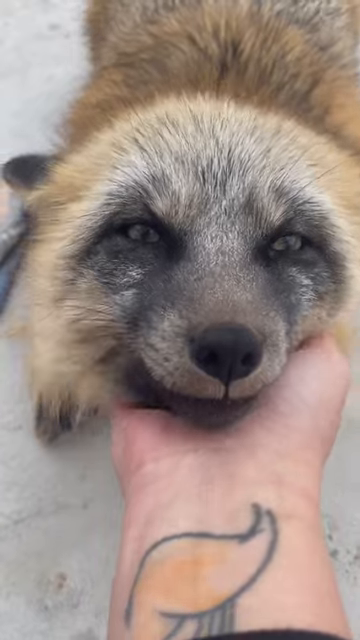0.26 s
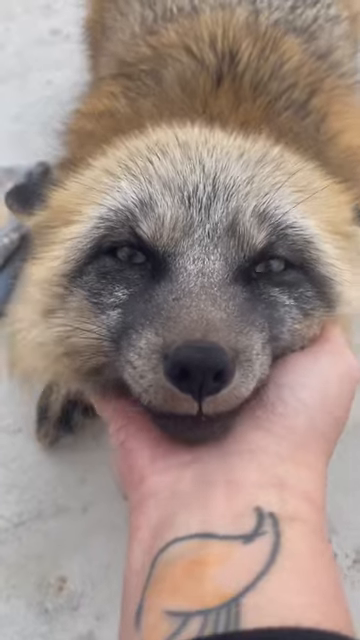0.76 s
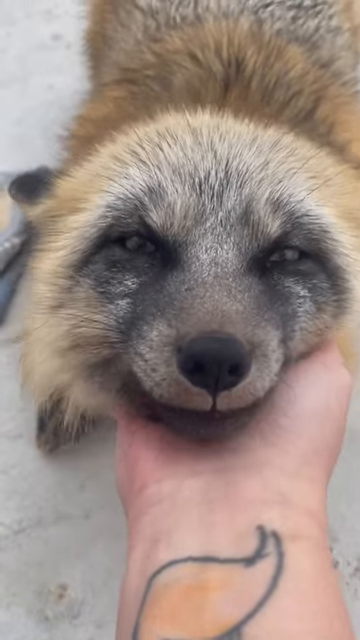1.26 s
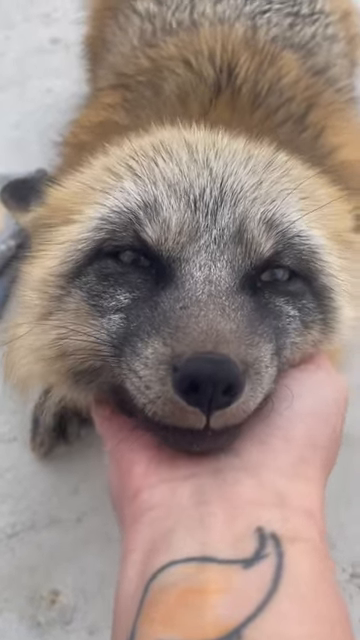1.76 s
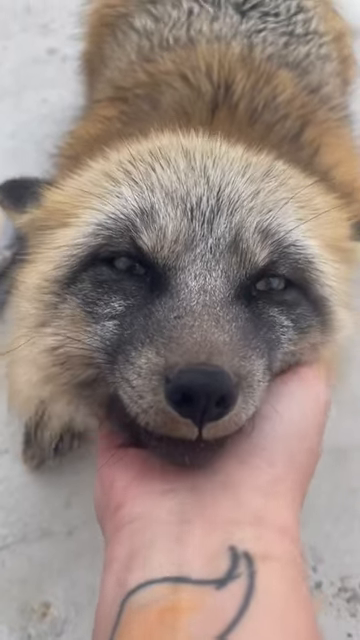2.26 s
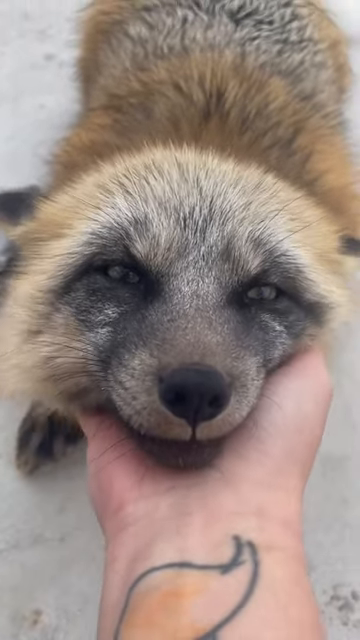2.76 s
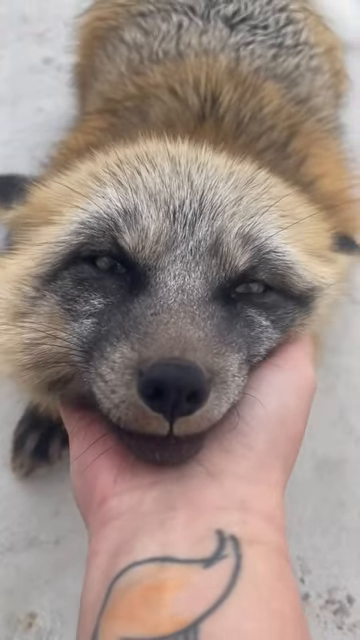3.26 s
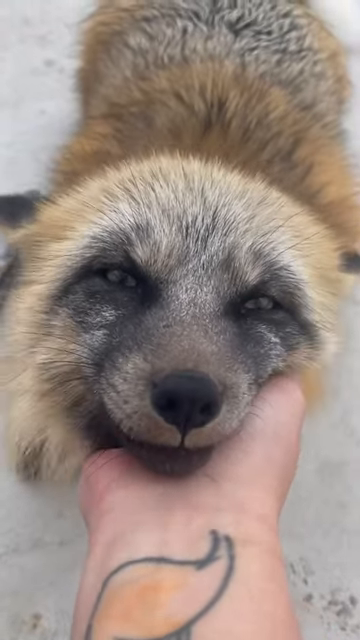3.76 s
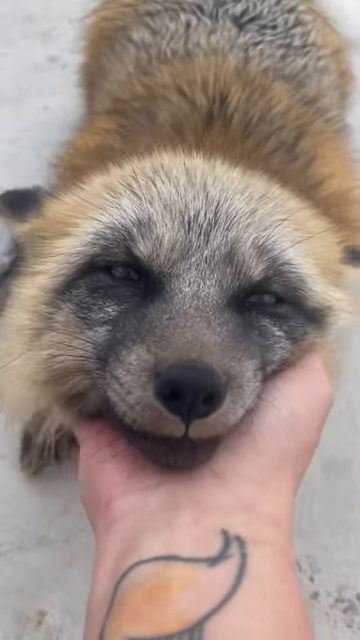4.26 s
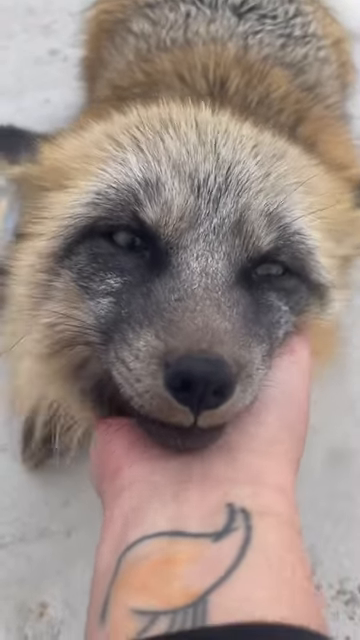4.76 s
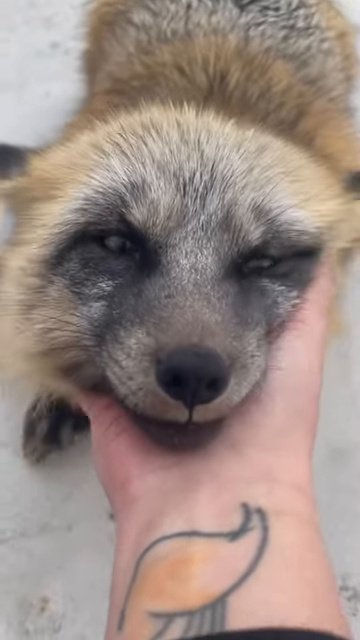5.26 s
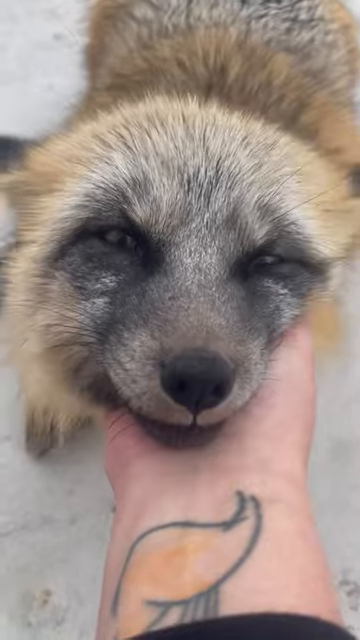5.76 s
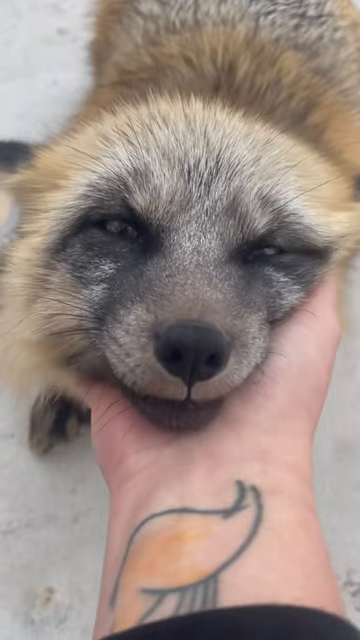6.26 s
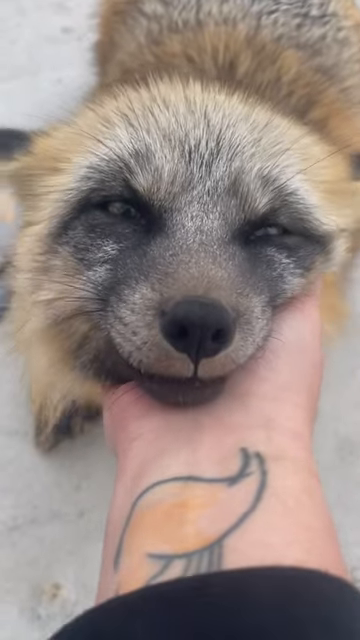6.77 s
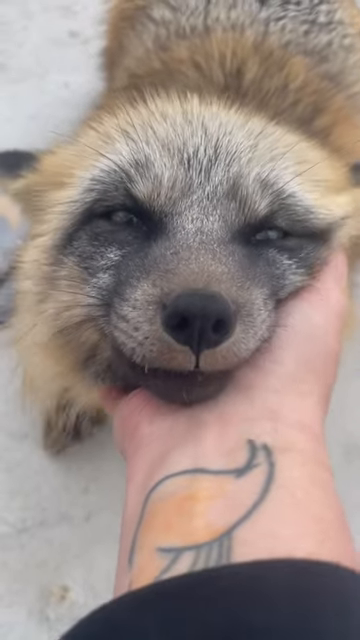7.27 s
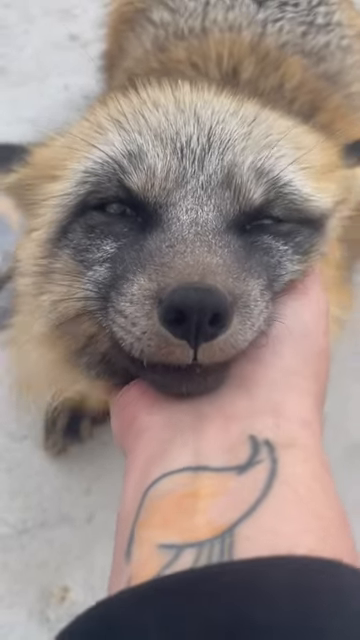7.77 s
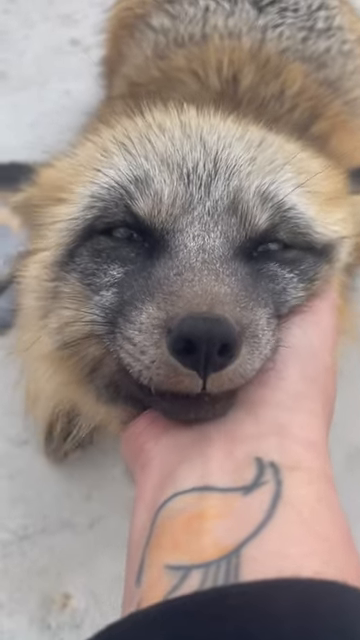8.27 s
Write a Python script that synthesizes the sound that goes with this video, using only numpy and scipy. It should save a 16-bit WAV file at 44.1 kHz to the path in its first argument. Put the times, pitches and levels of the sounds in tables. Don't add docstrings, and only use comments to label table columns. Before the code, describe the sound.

A fox very close by gives long, high nasal whines that sag at the end, over a low distant road rumble outdoors.

```python
import sys
import numpy as np
from scipy import signal
from scipy.fft import rfft, irfft, next_fast_len
from scipy.io import wavfile

SR = 44100
rng = np.random.default_rng(int(sys.argv[2]) if len(sys.argv) > 2 else 0)


def invert_db(x):
    u = np.asarray(x, float) / 20
    return 10 ** u


def wav_out(sig):
    wavfile.write(sys.argv[1], SR, np.round(np.clip(np.atleast_2d(sig).T, -1, 1) * 32767).astype(np.int16))


N = 376173
TIME = np.arange(N) / SR
BINS_HZ = np.arange(N // 2 + 1) * SR / N + 1e-3


def at(hz, points_hz, values):
    return np.interp(np.log(hz), np.log(np.maximum(points_hz, 1)), values)


def chance():
    real, imaginary = rng.standard_normal(len(BINS_HZ)), rng.standard_normal(len(BINS_HZ))
    return (real + 1j * imaginary) * np.sqrt(N / 2)


def noise(gain):
    return irfft(chance() * gain, next_fast_len(N))[:N]


def coloured(gain):
    x = noise(gain)
    return x / np.std(x)


def walk(rate):
    return coloured(1 / (1 + (BINS_HZ / rate) ** 2))


def peak(hz, width):
    return 1 / (1 + (2 * (BINS_HZ - hz) / width) ** 2) ** 1.5


def bell(x, centre, half):
    return np.exp(-((x - centre) / half) ** 2)


def swell(start, end, edge):
    ramp = np.clip(np.minimum(TIME - start, end - TIME) / edge, 0, 1)
    return np.sin(np.pi / 2 * ramp) ** 2


def ports(x, lead, side_db):
    turn = np.array([[1], [-1]]) / 2
    return irfft(rfft(x) * np.exp(1j * turn * lead) * invert_db(turn * side_db), N)


# (frequency [Hz], level [dB per Hz])
AIR = [(25, -81.5), (50, -62), (82, -54.5), (120, -62), (190, -62), (290, -78), (390, -78.5), (550, -81.5),
       (900, -82), (1400, -92), (3000, -100), (6500, -106), (9800, -99), (10700, -106)]
# (frequency [Hz], left leads by [rad], left minus right [dB], likeness [0-1])
AIR_PORTS = [(60, 0, -.5, .995), (200, 0, -1.5, .97), (360, 0, -4.5, .8), (600, -2.5, -2, .3),
             (1100, -3, -.5, .4), (1600, 0, -.5, .7), (3000, .7, 0, .85), (4200, .8, 0, .85),
             (4900, 3.1, 0, .95), (5500, 6.28, 0, 1), (6100, 6.3, 0, 1), (8400, 9.2, 0, 1),
             (9200, 9.45, 0, 1), (10600, 10.3, 0, 1)]
# (time [s], level [dB])
RUMBLE = [(0.03, -42.5), (1.66, -40), (1.69, -43.5), (1.95, -35.5), (2.25, -39.5), (2.33, -35),
          (2.37, -43.5), (2.47, -34), (2.54, -37.5), (3.46, -42), (5.26, -41.5), (5.31, -37.5),
          (5.92, -44.5), (6.09, -38), (8.41, -39.5), (8.53, -41)]
# (loudest at [s], half width [s], level [dB])
PASSES = [
    (1.3, .45, 3),
    (4.05, 0.28, 1.5),
    (5.05, .15, 2),
    (7.1, .4, 2),
    (8.299, 0.38, 5.5),
]
# (time [s], how far it faces the road [share])
TURN = [
    (.3, -1.5),
    (1.7, -0.41),
    (3.0, -.2),
    (4.3, 1),
    (4.9, 0.23),
    (6.9, .4),
    (8.5, 0.43),
]
BAND_TOPS_HZ = (120, 420, 1300, 4500)
RUMBLE_SHARES = (0.93, 0.14, .05, .05, .05)
TURN_DB = (0, 2.5, 5, 1.5, 1)
DRIFT_DB_PER_S = (-0.033, -0.34, -0.56, -0.18, -1.25)


def air():
    air_hz, air_db = np.transpose(AIR)
    port_hz, _, _, likeness = np.transpose(AIR_PORTS)
    like = np.clip(at(BINS_HZ, port_hz, likeness), 0, 1)
    rumble_db = np.interp(TIME, *np.transpose(RUMBLE)) - np.mean(RUMBLE, axis=0)[1]
    turned = np.interp(TIME, *np.transpose(TURN))
    passes_db = sum(db * bell(TIME, s, half) for s, half, db in PASSES) - 1.0
    treble_cut_db = 60 * np.clip(np.log2(BINS_HZ / 10700), 0, 1) * 0.76
    shape = invert_db(at(BINS_HZ, air_hz, air_db) - treble_cut_db) * np.sqrt(SR / 2)
    shared, own = np.zeros(N), np.zeros(N)
    for hz in 25 * 2 ** np.arange(0, 9.6, .5):
        band = shape * np.cos(np.pi * np.clip(np.log2(BINS_HZ / hz), -.5, .5))
        k = np.searchsorted(BAND_TOPS_HZ, hz)
        gain_db = RUMBLE_SHARES[k] * rumble_db + TURN_DB[k] * turned
        gain_db = gain_db + DRIFT_DB_PER_S[k] * (TIME - 4.0) + (k == 1) * passes_db
        gain_db = gain_db + 0.78 * walk(1.0) + 0.29 * walk(27.0)
        gain_db = gain_db + (hz > 8000) * 3.6 * walk(15)
        shared += invert_db(gain_db) * noise(band * np.sqrt((1 + like) / 2))
        own += invert_db(gain_db) * noise(band * np.sqrt((1 - like) / 2))
    return shared + np.array([[1], [-1]]) * own


# (pitch [Hz], wander [Hz], level [dB], start [s], end [s])
HUMS = [
    (81.35, 2.314, -35.5, 6.5, 7.7),
    (165.8, 6.13, -47.5, 0.4, 5.17),
    (382.1, 3.67, -57, 3, 8.5),
    (438.4, 5.3, -60, 2, 5.88),
    (485, 1.7, -55.5, 0, 0.41),
]


def hums():
    out = np.zeros(N)
    for hz, width, db, start, end in HUMS:
        phase = 2 * np.pi * np.cumsum(hz + width / 2 * walk(3.16)) / SR
        out += invert_db(db + 4.1 * walk(0.87)) * swell(start - .3, end + 0.4, 0.66) * np.sin(phase)
    return out


def background():
    port_hz, lead, side_db, _ = np.transpose(AIR_PORTS)
    return ports(air() + hums(), at(BINS_HZ, port_hz, lead), at(BINS_HZ, port_hz, side_db))


# (time [s], pitch [Hz])
PITCH = [
    [(.616, 869), (1.0, 822), (1.26, 785.2), (1.37, 769), (1.42, 699), (1.468, 685), (1.516, 553),
     (1.585, 452), (1.602, 497)],
    [(2.885, 908), (3.01, 926), (3.05, 887), (3.43, 845.7), (3.6, 850.5), (3.72, 800), (3.97, 754.5),
     (4.01, 706.7), (4.065, 634)],
    [(5.602, 949), (5.66, 905.5), (5.85, 932), (5.96, 909), (6.05, 855.5), (6.2, 881), (6.4, 854.3),
     (6.68, 837), (6.76, 655)],
    [(8.238, 923), (8.33, 950.5), (8.43, 929.6), (8.53, 948)],
]
# (time [s], level [dB], nostril opening [dB], breath pressure [dB])
EFFORT = [
    [(.612, -29.5, -21, -17.5), (.69, -29.5, -9.5, -14.5), (1.04, -28.5, -9, -13.5), (1.23, -28, -17, -9.5),
     (1.36, -28.5, -11.5, -12.5), (1.43, -26.5, -16.5, -17.5), (1.53, -32, -22.5, -16),
     (1.586, -27.5, -26.5, -21), (1.602, -38.5, -21, -20)],
    [(2.875, -42, -28, -35), (2.96, -35, -35, -25), (3.04, -28, -11.5, -16), (3.18, -29, -11.5, -14),
     (3.45, -28, -9.5, -15), (3.78, -28, -9.5, -13.5), (4.0, -28, -15, -17.5), (4.058, -27.5, -19, -23.5)],
    [(5.598, -29.5, -11, -20.5), (5.7, -29, -16, -19), (5.93, -25.5, -22.5, -18.5),
     (6.01, -31.5, -6.5, -20), (6.25, -27, -14.5, -15), (6.4, -31, -5, -19), (6.55, -29, -14, -17),
     (6.7, -30, -10.5, -19), (6.768, -28.5, -23, -27.5)],
    [(8.236, -25.5, -22.5, -26), (8.32, -27, -14, -23.5), (8.42, -29.5, -7, -22.5), (8.53, -28, -15, -21)],
]
# (depth [share], period [s], highest crest at [s], dies away in [s])
SWAY = [
    (0.0083, .15, .97, 0.41),
    (0.0283, .172, 3.145, 0.52),
    (.022, .172, 6.145, 0.33),
    (0.0066, 0.174, 9.9, 1.3),
]
# (roughness at the start [0-1], roughness gained [per s], most [0-1.1])
ROUGH = [
    (.35, 1.1, .9),
    (.35, .55, 1.1),
    (.12, .6, .7),
    (.12, 0, .12),
]
# (near 2.8 kHz [dB], near 3.7 kHz [dB], near 4.8 kHz [dB], near 9 kHz [dB])
POSE = [
    (0, -5, -12, -6),
    (-3.5, 3, -3, -1.5),
    (-0.5, 6, 4, 5),
    (8, 4, 4.5, 9),
]
# (time [s], pitch jump [share], level change [dB], half width [s], pinch [dB])
JOLTS = [(.616, 0.17, -3.5, 0.0061, -0.5), (0.802, -0.096, -1, 0.01, -19), (1.098, -0.039, -1, 0.01094, -6),
         (1.4, -0.075, -6, 0.0098, 2.5), (2.928, 0.0015, -3, .01, -5.5), (3.273, 0.012, -5, 0.014, -0.5),
         (3.619, 0.048, -5, 0.0097, -5), (3.961, .005, -6.5, 0.0079, 0), (3.992, -.08, -5, .014, -3),
         (5.602, 0.045, 1.5, .01, 0), (5.635, 0.083, -7, 0.01, -17), (5.98, 0.065, -6, 0.0092, -4.5),
         (6.323, 0.053, -4, 0.0083, -5), (6.664, 0.086, -5.5, 0.0044, 0), (8.245, 0.11, -3, 0.014, -7.5),
         (8.352, 0.04, -6, 0.012, -11.5)]
# (frequency [Hz], overtone level [dB], hiss level [dB])
NOSE = [(426, -9, -2), (560, -1, -36), (2210, 2.5, 0), (3060, -2, 6), (3430, -16.5, -42), (3960, -28, -26),
        (4330, -4.5, -35), (5040, 1, 6), (5600, -9.5, -37), (6030, 1, 11.5), (7360, -10.5, -12),
        (8080, 0.5, 7), (10310, -6.5, 7), (10300, -20, -40)]
BAND_EDGES_HZ = (1130, 2080, 4000)


def whines():
    times, *controls = np.vstack(EFFORT).T
    level_db, open_db, press_db = (np.interp(TIME, times, c) for c in controls)
    gates = np.array([swell(w[0][0], w[-1][0] + 0.0065, edge=0.0066) for w in EFFORT])
    third_db, fourth_db, mid_db, top_db = np.transpose(POSE) @ (gates > 0)
    hz, rough, pinch_db = np.interp(TIME, *np.vstack(PITCH).T), 0, 0
    for whine, gate, sway, loosening in zip(EFFORT, gates > 0, SWAY, ROUGH):
        share, period, crest, dies = sway
        first, per_s, most = loosening
        since = TIME - crest
        hz = hz * (1 + gate * share * np.exp(-np.abs(since) / dies) * np.cos(2 * np.pi * since / period))
        rough = rough + gate * np.minimum(first + per_s * (TIME - whine[0][0]), most)
    third_db = third_db + 7.5 * (rough - .6)

    for s, jump, db, half, pinch in JOLTS:
        bump = bell(TIME, s, half)
        hz = hz * (1 + jump * bump)
        level_db = level_db + db * bump
        open_db = open_db + (1.5 - db) * bump
        pinch_db = pinch_db + pinch * bell(TIME, s + 0.073, 0.038)
        rough = rough * (1 + .9 * bump) + 3 * abs(jump) * bump
    open_db = open_db + pinch_db

    third_db = third_db + 0.74 * open_db + 0.53 * press_db
    band_db = level_db + np.array([0 * open_db, open_db, third_db, press_db])
    top_db = top_db + 0.72 * np.clip(open_db + 15, -16, 4)

    shake = (.002 + .005 * rough) * walk(25) + .019 * rough * walk(170)
    shimmer_db = 1.2 * rough * walk(130)
    phase = 2 * np.pi * np.cumsum(hz * (1 + shake)) / SR
    nose_hz, tone_db, air_db = np.transpose(NOSE)
    tone = np.zeros(N)
    for k in range(1, 26):
        overtone_hz = k * hz
        db = band_db[0] + at(overtone_hz, nose_hz, tone_db) + shimmer_db
        db += min(k - 1, 3) * (.5 * walk(12.0) + 0.77 * rough * walk(170))
        for edge_hz, below, above in zip(BAND_EDGES_HZ, band_db, band_db[1:]):
            db += (above - below) * np.clip((overtone_hz - edge_hz) / 100 + .5, 0, 1)
        db += fourth_db * bell(overtone_hz, 3700, 450) + mid_db * bell(overtone_hz, 4800, 400)
        db += top_db * np.clip((overtone_hz - 7500) / 800, 0, 1)
        db -= 16 * np.maximum(overtone_hz - 11600, 0) / 1000
        tone += invert_db(db) * np.cos(k * phase + 0.147 * k * (k - 1))

    hiss_db = at(BINS_HZ, nose_hz, air_db) - 16 * np.maximum(BINS_HZ - 11600, 0) / 1000
    hiss = coloured(invert_db(hiss_db) * (BINS_HZ > 450))
    hiss *= (.2 + .9 * rough) * invert_db(band_db[3] + top_db / 2 + 1.5 * walk(30))
    hiss *= 1 + .6 * np.cos(phase)
    voice = gates.sum(axis=0) * (np.sqrt(2) * tone + hiss)
    return irfft(rfft(voice) * (1 - .75 * peak(4000, 700)), N)


# (start [s], end [s], level [dB])
WHISTLES = [
    (0.823, .975, -55.5),
    (1.11, 1.3, -52),
    (1.48, 1.57, -74),
    (3.288, 3.37, -62.5),
    (5.66, 5.71, -62),
]


def whistles():
    level = sum(invert_db(db + 2.8 * walk(25)) * swell(a, b, .02) for a, b, db in WHISTLES)
    return level * coloured(peak(12600, 2800))


# (start [s], end [s], centre [Hz], width [Hz], level [dB])
BREATHS = [(1.58, 1.66, 9000, 2500, -60), (4.05, 4.13, 9000, 2500, -59), (4.62, 4.72, 8800, 2500, -66),
           (5.44, 5.62, 9300, 2500, -65), (6.75, 6.82, 8800, 3000, -58), (7.19, 7.28, 9200, 2500, -69),
           (8.12, 8.27, 9300, 3000, -58), (2.761, 2.778, 950, 250, -50), (4.17, 4.52, 2050, 1300, -56),
           (4.2, 4.29, 1450, 150, -61), (4.26, 4.42, 1620, 90, -53)]


def breaths():
    out = np.zeros(N)
    for start, end, hz, width, db in BREATHS:
        gate = swell(start, end, .25 * (end - start))
        out += invert_db(db + 1.5 * walk(15)) * gate * coloured(peak(hz, width))
    return out


# (time [s], peak level [dB])
TICKS = [
    (1.7933, -46),
    (5.0494, -63),
    (5.3644, -64),
    (7.0554, -46),
    (7.4515, -45),
    (7.7593, -46.5),
    (8.106, -49.5),
]


def ticks():
    out = np.zeros(N)
    t = np.arange(88) / SR
    for s, db in TICKS:
        i = int(s * SR)
        out[i:i + len(t)] += invert_db(db + 14.0) * np.exp(-t / 0.0001) * np.sin(2 * np.pi * 7500 * t)
    return out


# (frequency [Hz], left leads by [rad])
VOICE_LEAD = [(430, 0), (690, .15), (1900, 0), (2330, .4), (3500, 0), (4390, 3.1), (4820, 3.1), (5430, 6.2),
              (6000, 6.3), (9000, 9.42), (10600, 10.6), (11300, 12.57)]
# (frequency [Hz], left minus right [dB])
VOICE_SIDE = [(60, -0.5), (110, -0.5), (200, -1.5), (360, -3.5), (660, 2.5), (1210, 0.5), (2210, 0.5),
              (4030, -3.0), (7340, 0.0), (13400, 0.0)]
# (from [s], to [s], null starts [Hz], null ends [Hz])
NULLS = [
    (0, 2.2, 3850, 4700),
    (2.2, 5, 4500, 4800),
    (5, 7.5, 4620, 4780),
    (7.5, 9, 5130, 5250),
]


def scene():
    out = background()
    fox = whines() + whistles() + breaths() + ticks()
    lead_hz, lead = zip(*VOICE_LEAD)
    side_db = at(BINS_HZ, *np.transpose(VOICE_SIDE))
    for start, end, *null_hz in NULLS:
        posed_hz = [*lead_hz[:5], *null_hz, *lead_hz[7:]]
        posed_fox = fox * (TIME >= start) * (TIME < end)
        out = out + ports(posed_fox, at(BINS_HZ, posed_hz, lead), side_db)
    return out


def roll_off(x):
    return signal.sosfilt(signal.butter(12, 13600, fs=SR, output="sos"), x)


def record(dry):
    fade_db = -10 * np.clip((BINS_HZ - 10700) / 600, 0, 1)
    dull = irfft(rfft(dry) * invert_db(fade_db), N)
    mix = dull * (TIME > .0282)
    return roll_off(mix)


dry = scene()
out = record(dry)
wav_out(out)
```